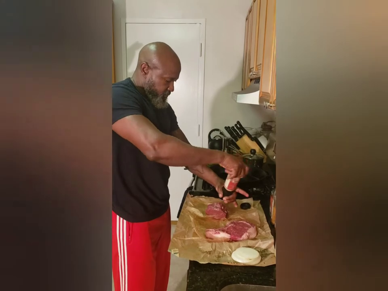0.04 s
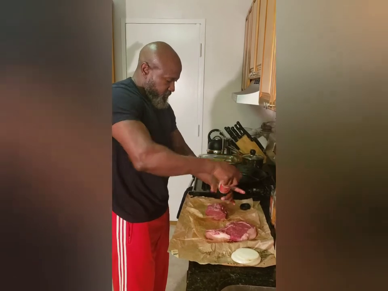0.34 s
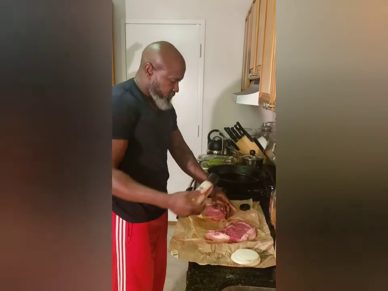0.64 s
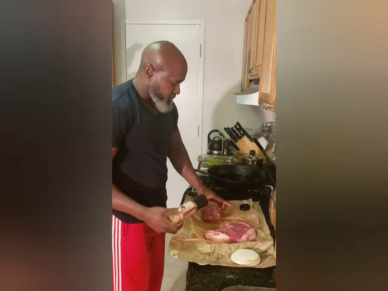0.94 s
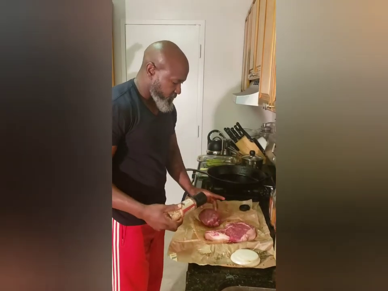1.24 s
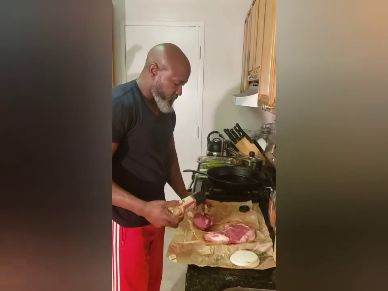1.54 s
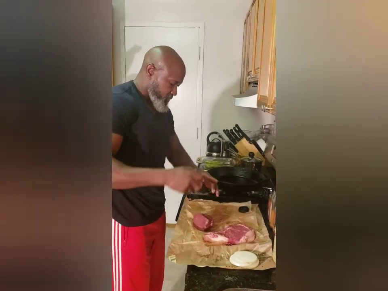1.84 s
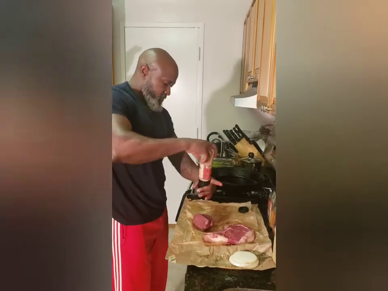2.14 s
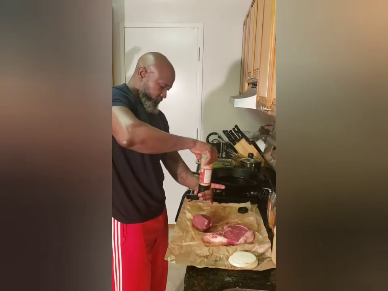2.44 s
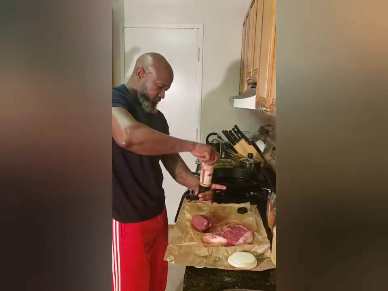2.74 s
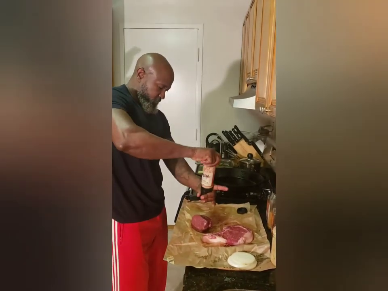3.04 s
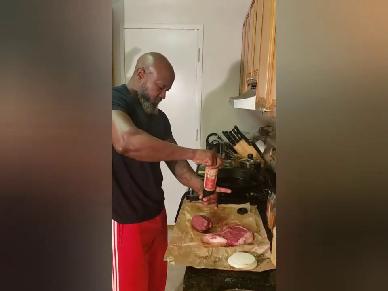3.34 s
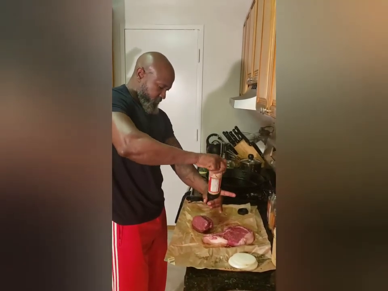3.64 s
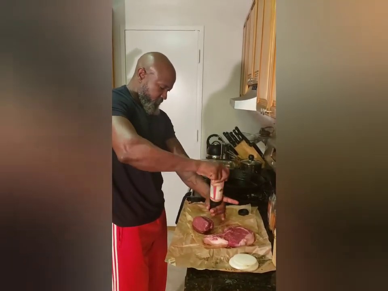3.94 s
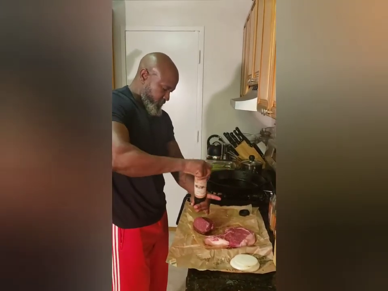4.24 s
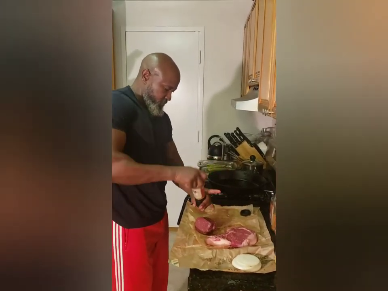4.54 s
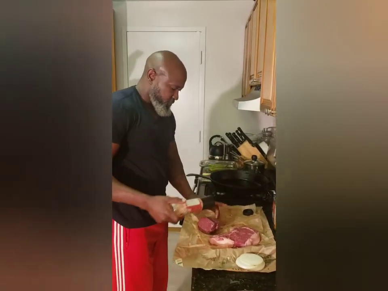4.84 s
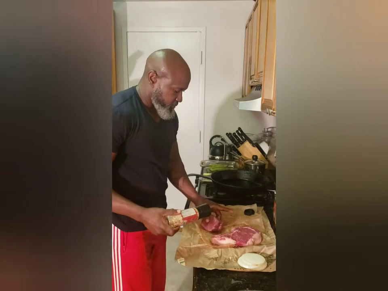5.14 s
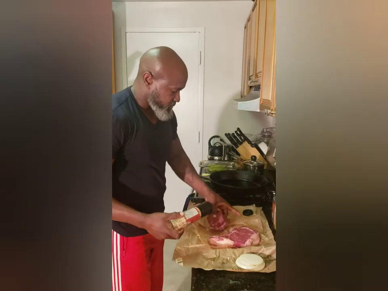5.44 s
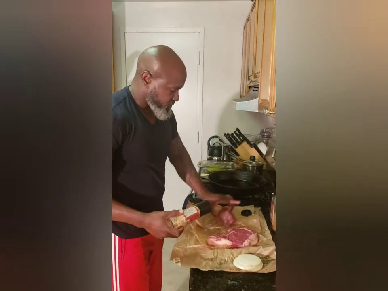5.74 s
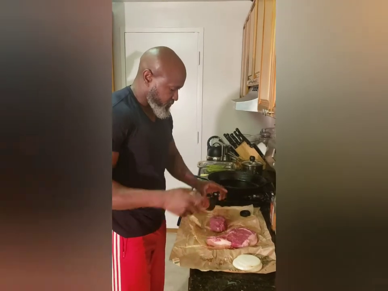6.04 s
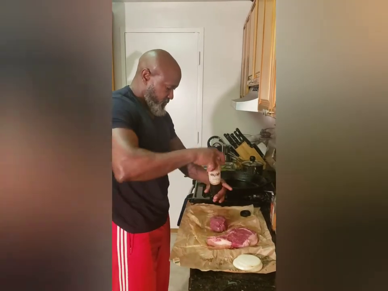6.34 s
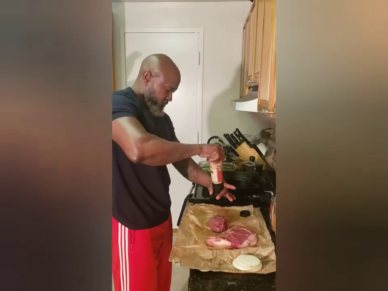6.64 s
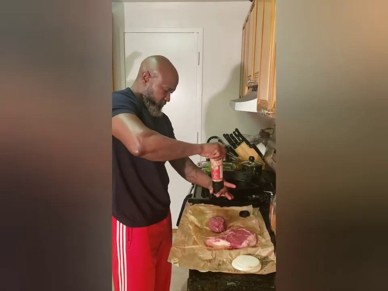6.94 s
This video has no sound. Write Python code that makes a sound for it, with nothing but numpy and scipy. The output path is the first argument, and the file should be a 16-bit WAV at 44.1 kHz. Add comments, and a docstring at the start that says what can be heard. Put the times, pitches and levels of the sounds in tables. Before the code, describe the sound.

A hand-held salt grinder gives a few crisp crunches, then its crystals slide as the jar tips. After a soft paper rustle comes a longer run of rasping twists, about three a second, dotted with sharp snaps. Salt pours along the jar again, paper crinkles under meat being turned, and a couple more twists follow. An appliance hums throughout, and the small kitchen adds a short echo to the nearby grinding.

```python
"""A hand-held salt grinder is twisted over meat, about three rasping turns a second.
The burr catches and slips, cracking crystals and ringing the plastic housing; loose salt slides
in the jar and pours down its wall when it is tipped. Between bouts the meat is turned over on
rustling paper, and there is one faint, thin squeak. An appliance hums throughout, and the hard
walls of the small kitchen answer every crunch."""
import sys
import numpy as np
from scipy import signal
from scipy.fft import rfft, irfft, next_fast_len
from scipy.io import wavfile
from scipy.ndimage import map_coordinates

SR = 44100
rng = np.random.default_rng(int(sys.argv[2]) if len(sys.argv) > 2 else 0)


def wrap_up_sound(samples):
    """Save the sound to the file named by the first command line argument, as 16-bit audio."""
    columns = np.atleast_2d(samples).T
    # keep every value between -1 and 1, then stretch to whole-number steps
    tamed = np.clip(columns, -1, 1)
    steps = np.round(tamed * 32767).astype(np.int16)
    wavfile.write(sys.argv[1], SR, steps)


N = 316638


def amp(db):
    """Decibels to gain."""
    return 10 ** (np.asarray(db) / 20)


def unit(x):
    """Scale to rms 1."""
    return x / np.sqrt(np.mean(x ** 2) + 1e-20)


def along(points, hz):
    """(frequency [Hz], value) points read on a log axis."""
    point_hz, values = np.transpose(points)
    return np.interp(np.log(hz + 1), np.log(point_hz + 1), values)


def curve(points):
    """(time [s], value) points joined by straight lines, one value per sample."""
    return np.interp(np.arange(N) / SR, *np.transpose(points))


def wobble(knots_per_s, step=16):
    """Smooth random curve, spread about 1."""
    coarse = np.arange(0, N + step, step)
    knots = rng.standard_normal(int(N * knots_per_s / SR) + 4)
    return np.interp(np.arange(N), coarse, map_coordinates(knots, [coarse * knots_per_s / SR]))


def filtered(x, response):
    """Apply a complex frequency response."""
    size = next_fast_len(N + SR // 2)
    return irfft(rfft(x, size) * response(np.fft.rfftfreq(size, 1 / SR)), size)[..., :N]


def coloured(x, spectrum, size=2048):
    """Minimum-phase filter of unit energy; clicks keep their attack."""
    cepstrum = irfft(np.log(amp(along(spectrum, np.fft.rfftfreq(size, 1 / SR)))))
    cepstrum[1:size // 2] *= 2
    cepstrum[size // 2 + 1:] = 0
    pulse = irfft(np.exp(rfft(cepstrum)))
    return signal.fftconvolve(x, pulse / np.linalg.norm(pulse))[:N]


def grains(per_s, spread_db):
    """Tiny contacts at random moments, most small, a few large; rms 1."""
    hit = rng.random(N) < per_s / SR
    size = amp(spread_db * np.clip(rng.standard_normal(N), -2, 2))
    return unit(hit * size * rng.choice([-1, 1], N))


def strokes(starts_s, holds_s, levels_db, rise_db_per_s, fall_db_per_s, depth_db=60):
    """Gain of a row of movements: each swells, holds and dies away; overlaps add in power."""
    t, power = np.arange(N) / SR, np.zeros(N)
    for start, hold, db, rise in np.broadcast(starts_s, holds_s, levels_db, rise_db_per_s):
        edges_s = [start - depth_db / rise, start + hold + depth_db / fall_db_per_s]
        span = slice(*np.searchsorted(t, edges_s))
        attack_db = rise * np.maximum(start - t[span], 0)
        decay_db = fall_db_per_s * np.maximum(t[span] - start - hold, 0)
        power[span] += amp(db - attack_db - decay_db) ** 2
    return np.sqrt(power)


def slips(per_s=45, scatter=0.4, life_s=0.002, jolt_db=10.5, count=800):
    """Gain of the burr letting go at uneven moments, each with a brief jolt."""
    gap, size = rng.standard_normal((count, 2)).T
    onsets = (np.cumsum(np.exp(scatter * gap)) / per_s * SR).astype(int)
    jolts = np.bincount(onsets, amp(jolt_db + 2 * size), N)[:N]
    return 1 + signal.lfilter([1], [1, -np.exp(-1 / (life_s * SR))], jolts)


# Burr and housing resonances: (frequency [Hz], width [Hz], relative level [dB])
HOUSING_MODES = [(1920, 90, -20), (2860, 150, -13), (3150, 170, 10), (3550, 170, 5), (3870, 710, 19),
                 (6350, 200, -8)]

def housing(x, grip_db=4, pitch_drift=0.03):
    """The grinder's parts ring; strength and pitch shift with the grip and the load of salt."""
    ring = np.zeros(N)
    for k, (hz, width_hz, db) in enumerate(HOUSING_MODES):
        mode = signal.lfilter(*signal.iirpeak(hz, hz / width_hz, SR), x)
        ring += (-1) ** k * amp(db + grip_db * np.tanh(wobble(7.3))) * mode
    read_position = np.cumsum(1 + pitch_drift * wobble(4.4)) % N
    return unit(np.interp(read_position, np.arange(N), ring))


# Twists of the burr: (time [s], hold [s], relative rasp [dB], deep crunch [dB], relative slide [dB])
TWIST_STROKES = [(0.0, 0.005, -39, -46, -31.5), (0.197, 0.018, -40, -44, -34.5),
                 (0.258, 0.013, -38.5, -43, -31.5), (2.278, 0.054, -34, -38.5, -32.5),
                 (2.639, 0.085, -36.5, -44, -39), (2.989, 0.033, -36, -47.5, -35.5),
                 (3.294, 0.077, -42.5, -50, -34.5), (3.608, 0.028, -35.5, -45.5, -30.5),
                 (3.883, 0.075, -42, -52.5, -33.5), (4.199, 0.092, -43, -54, -38),
                 (4.516, 0.016, -40.5, -50.5, -42), (6.55, 0.045, -45, -45, -37.5),
                 (6.898, 0.018, -41.5, -43, -34.5)]
# Fracture spectrum: (frequency [Hz], relative density [dB])
CRUNCH_SPECTRUM = [(600, -28.5), (1500, -23), (2400, 2), (3400, 10), (4500, 6), (5400, -1), (7400, -3.5),
                   (8700, -37.5), (10500, -10), (12000, 1), (15500, 4.5)]
# Deep crunch of big crystals: (frequency [Hz], relative density [dB])
DEEP_SPECTRUM = [(250, -10), (700, -7.5), (1200, -0.5), (2000, -0.5), (2800, -0.5), (5000, -33),
                 (15000, -34)]

def crushing(rise_db_per_s=510, fall_db_per_s=262, knock_db=-23.5):
    """Each slip of the burr is a clump of fractures that shakes the housing; winding back scrapes."""
    start_s, hold_s, rasp_db, deep_db, _ = np.transpose(TWIST_STROKES)
    bite = strokes(start_s, hold_s, rasp_db, rise_db_per_s, fall_db_per_s)
    big_crystals = strokes(start_s, hold_s, deep_db, rise_db_per_s, fall_db_per_s)
    jogged, scrape = regripping()
    knock = amp(knock_db) * jogged  # the jar's dull rattle in the hand
    fractures = unit(grains(per_s=2600, spread_db=3.5) * amp(1.4 * wobble(110)) * slips())
    rasp = amp(2.3) * coloured(fractures, CRUNCH_SPECTRUM) + amp(-3.5) * housing(fractures)
    deep = coloured(grains(per_s=1200, spread_db=4.5), DEEP_SPECTRUM)
    return np.hypot(bite, scrape) * rasp + np.hypot(big_crystals, knock) * deep


def stirring():
    """Gain of the loose crystals, stirred by every twist, regrip and tip of the jar."""
    start_s, hold_s, _, _, slide_db = np.transpose(TWIST_STROKES)
    twisted = strokes(start_s, hold_s, slide_db, rise_db_per_s=339, fall_db_per_s=221.5)
    jogged, _ = regripping()
    start_s, hold_s, slide_db, *_ = np.transpose(JAR_TIPS)
    tipped = strokes(start_s, hold_s, slide_db, rise_db_per_s=162, fall_db_per_s=116.5)
    return np.sqrt(twisted ** 2 + jogged ** 2 + tipped ** 2)


# Crystal contact spectrum: (frequency [Hz], relative density [dB])
GRIT_SPECTRUM = [(1000, -28.5), (1800, -30), (2600, -17.5), (3200, -13), (4400, -3.5), (5400, -2),
                 (7500, 1), (8600, -8.5), (10300, -6), (12000, -0.5), (15500, -1.5)]
# Trickle of fine powder: (time [s], relative level [dB])
POWDER_FLOW = [(0.0, -48), (.14, -58), (.42, -75), (.75, -50), (1.22, -61), (1.42, -58), (1.56, -64),
               (1.85, -61), (1.92, -43), (2.25, -42), (3.15, -50.5), (3.9, -51), (4.85, -50), (5.35, -64),
               (5.68, -75), (5.85, -54), (6.08, -52), (6.6, -55), (7.18, -56)]
# Powder spectrum: (frequency [Hz], relative density [dB])
POWDER_SPECTRUM = [(2000, -47.5), (5000, -24), (7500, -12), (8600, -25), (10500, -12), (12000, -7.5),
                   (15500, -4.5)]

def sliding(trickle_db=-1, shaken_db=-19):
    """Loose crystals hiss against each other and the jar in small avalanches; powder trickles on."""
    stir = stirring()
    contacts = grains(per_s=6000, spread_db=1.5) * amp(2.18 * wobble(70))
    powder = coloured(grains(per_s=2000, spread_db=2.5), POWDER_SPECTRUM)
    flow = amp(trickle_db + curve(POWDER_FLOW)) + amp(shaken_db) * stir
    return amp(2) * stir * coloured(contacts, GRIT_SPECTRUM) + flow * powder


# Appliance air noise: (frequency [Hz], relative density [dB])
AIR_SPECTRUM = [(20, -22), (42, -13.5), (75, -1), (98, -7), (150, -3), (260, -7), (370, -14), (500, -13),
                (680, -25), (1050, -28), (1500, -39), (2300, -48), (7500, -52), (15500, -56)]
# Left-right likeness of the air noise: (frequency [Hz], correlation [0-1])
AIR_CORRELATION = [(60, 0.89), (150, 0.86), (300, 0.75), (600, 0.43), (1500, 0.14), (15000, 0)]
# Motor tones: (frequency [Hz], rms level [dB])
HUM_TONES = [(76, -58.5), (119, -55.5), (177.6, -60), (247, -65), (414.5, -65), (829, -77.5), (1050, -81.5)]

def appliance(air_db=-48, waver_db=0.63, waver_rad=0.49):
    """A motor's slightly unsteady hum in a low rush of air."""
    def mid_side_gains(hz):
        angle = np.arccos(np.clip(along(AIR_CORRELATION, hz), -1, 1)) / 2
        return amp(along(AIR_SPECTRUM, hz)) * [np.cos(angle), np.sin(angle)]

    mid, side = filtered(rng.standard_normal((2, N)), mid_side_gains)
    air = unit(np.array([mid + side, mid - side]))
    t, hum = np.arange(N) / SR, np.zeros(N)
    for hz, db in HUM_TONES:
        peak = np.sqrt(2) * amp(db + waver_db * wobble(2.6))
        hum += peak * np.sin(2 * np.pi * hz * t + waver_rad * wobble(7))
    return amp(air_db) * air + hum


# The hand regrips or winds back: (time [s], hold [s], relative slide [dB], relative scrape [dB])
GRIP_SHIFTS = [(0.096, 0.0031, -31, -60), (0.318, 0.008, -36, -62), (0.476, 0.0051, -47, -71.5),
               (1.46, 0.017, -54, -52.5), (1.901, .055, -48, -83), (1.989, 0.026, -37, -64),
               (2.125, 0.13, -43, -54), (2.449, 0.021, -43, -55), (2.514, 0.11, -48, -58.5),
               (2.861, 0.051, -42.5, -53), (3.222, 0.1, -45, -54), (3.519, 0.018, -44.5, -50),
               (3.78, 0.095, -46, -51.5), (4.097, 0.1, -51.5, -59), (4.362, 0.032, -47, -61.5),
               (4.449, .035, -43, -53), (4.641, 0.039, -46.5, -49.5), (6.26, 0.083, -48, -62),
               (6.4, 0.086, -47.5, -77), (6.481, .04, -40, -46.5), (6.696, .014, -38.5, -49.5),
               (6.817, 0.052, -41.5, -50), (7.083, 0.068, -47.5, -51.5)]

def regripping(rise_db_per_hold=21.5, fall_db_per_s=315):
    """Gains of jogged crystals and idle burr; short jolts start sharply, long moves gently."""
    start_s, hold_s, slide_db, scrape_db = np.transpose(GRIP_SHIFTS)
    return [strokes(start_s, hold_s, db, rise_db_per_hold / hold_s, fall_db_per_s)
            for db in (slide_db, scrape_db)]


# Single crystals snap or strike the jar: (time [s], relative level [dB], relative body send [dB])
CRYSTAL_SNAPS = [(0.0995, -15, -45), (0.204, -25.5, -13), (0.4756, -21, -49), (.628, -21, -31),
                 (1.005, -31.5, -36), (1.4507, -30, -28), (1.991, -17, -45), (2.4573, -22, -25),
                 (2.6454, -32, -8), (2.678, -22, -6.5), (2.717, -27, -6), (2.7394, -22.5, -12.5),
                 (2.995, -20, -8.5), (3.2857, -13.5, -20), (3.3272, -17.5, -14.5), (3.385, -14, -44),
                 (3.5998, -13.5, -20.5), (3.621, -14.5, -14), (3.886, -18.5, -10.5), (4.518, -20.5, -13),
                 (4.891, -15, -31), (5.212, -25.5, -26.5), (5.772, -24.5, -28), (6.5531, -12, -17),
                 (6.597, -13.5, -18.5), (6.689, -15.5, -35), (6.923, -16, -18)]

def snapping(break_s=0.00063, crumble_s=0.024, crumble_db=-17):
    """A big crystal breaks in a millisecond; its splinters crumble after it."""
    t = np.arange(SR // 10) / SR
    envelope = np.exp(-t / break_s) + amp(crumble_db) * np.exp(-t / crumble_s)
    sharp, body = np.zeros((2, N + SR))
    for start_s, db, body_db in CRYSTAL_SNAPS:
        burst = amp(db) * envelope * rng.standard_normal(len(t))
        start = round(start_s * SR)
        sharp[start:start + len(t)] += burst
        body[start:start + len(t)] += burst * amp(body_db)
    return amp(-7.5) * coloured(sharp, GRIT_SPECTRUM) + amp(11.5) * coloured(body, CRUNCH_SPECTRUM)


# The jar is tipped level:
# (time [s], hold [s], relative slide [dB], pour [dB], landing time [s], relative rattle [dB])
JAR_TIPS = [(0.59, 0.1, -36.5, -54, 0.6, -47), (4.782, 0.077, -31.5, -37, 4.87, -56)]
# Salt pouring down the wall: (frequency [Hz], relative density [dB])
POUR_SPECTRUM = [(1500, -42), (2300, -7), (2900, -20), (3600, -8), (4300, 6.5), (5300, -4), (6500, 1),
                 (8000, -24), (12000, -21)]
# Salt landing: (frequency [Hz], relative density [dB])
RATTLE_SPECTRUM = [(500, -30), (1100, -6.5), (2000, 1), (2700, -2), (4300, -5), (7000, -4), (9000, -14),
                   (15500, -10)]

def tumbling(landing_hold_s=0.061):
    """The load pours brightly down the jar wall and lands with a hollow rattle."""
    start_s, hold_s, _, pour_db, landing_s, rattle_db = np.transpose(JAR_TIPS)
    pour = strokes(start_s, hold_s, pour_db, rise_db_per_s=206, fall_db_per_s=300)
    landing = strokes(landing_s, landing_hold_s, rattle_db, rise_db_per_s=698, fall_db_per_s=89.5)
    rattle = coloured(grains(per_s=3600, spread_db=4), RATTLE_SPECTRUM)
    hiss = coloured(grains(per_s=4300, spread_db=7), POUR_SPECTRUM)
    return amp(6) * landing * rattle + pour * hiss


# Meat handled on paper: (time [s], hold [s], relative rustle [dB], crisp crackle [dB])
PAPER_TOUCHES = [(1.044, 0.044, -61.5, -49.5), (1.29, 0.1, -89, -63.5), (5.227, .035, -66.5, -52),
                 (5.4, 0.01, -70, -65), (5.794, 0.017, -51, -36), (5.832, 0.0084, -53.5, -45)]
# Paper spectrum: (frequency [Hz], relative density [dB])
RUSTLE_SPECTRUM = [(200, -19), (700, -5), (1500, 0), (3500, 3.5), (5500, -6), (7400, -3), (8800, -19),
                   (15500, -1.5)]

def paper(rise_db_per_s=607, fall_db_per_s=165):
    """The salted sheet rustles and crackles under the meat."""
    start_s, hold_s, rustle_db, crisp_db = np.transpose(PAPER_TOUCHES)
    rustle_gain = strokes(start_s, hold_s, rustle_db, rise_db_per_s, fall_db_per_s)
    crisp_gain = strokes(start_s, hold_s, crisp_db, rise_db_per_s, fall_db_per_s)
    crinkles = unit(grains(per_s=2300, spread_db=5.5) * amp(3.7 * wobble(60)))
    crisp = coloured(grains(per_s=3000, spread_db=5), GRIT_SPECTRUM)
    return amp(12) * rustle_gain * coloured(crinkles, RUSTLE_SPECTRUM) + crisp_gain * crisp


# Faint squeak: (time [s], pitch [Hz])
SQUEAK_PITCH = [(1.6, 12900), (1.66, 13400), (1.72, 12600), (1.76, 12200), (1.8, 12700), (1.87, 12000)]

def squeak(level_db=-62, fade_db_per_s=400, rough_rad=2.1):
    """A narrow, slightly rough whistle wavers high in the treble."""
    start_s, end_s = SQUEAK_PITCH[0][0], SQUEAK_PITCH[-1][0]
    gain = strokes(start_s, end_s - start_s, level_db, fade_db_per_s, fade_db_per_s)
    phase = 2 * np.pi * np.cumsum(curve(SQUEAK_PITCH)) / SR
    return gain * np.sin(phase + rough_rad * wobble(500))


# Kitchen reverberation: (frequency [Hz], T60 [s])
KITCHEN_T60 = [(300, 0.64), (3000, 0.25), (8000, 0.34), (15000, 0.073)]

def kitchen(x, early_life_s=0.0065, early_share=0.55, paths=8):
    """Counter and cupboards answer at once, then the room dies away."""
    hz, t, noise = signal.stft(rng.standard_normal((paths, 2, SR // 3)), SR, nperseg=256)
    decay = amp(-60 * t / along(KITCHEN_T60, hz)[:, None])
    tail = signal.istft(noise * decay, SR, nperseg=256)[1]
    early = rng.standard_normal(tail.shape) * np.exp(-np.arange(tail.shape[-1]) / SR / early_life_s)
    responses = np.sqrt(1 - early_share) * tail / np.linalg.norm(tail[0, 0])
    responses += np.sqrt(early_share) * early / np.linalg.norm(early[0, 0])
    # each crystal radiates in its own direction, so the mix of paths changes quickly
    weights = np.array([wobble(70) for _ in range(paths)])
    weights /= np.linalg.norm(weights, axis=0)
    return signal.oaconvolve((weights * x)[:, None], responses, axes=2).sum(0)[:, :N]


# Where the grinder is held: (time [s], direct left minus right [dB])
GRINDER_PAN = [(0, 0), (.5, -3.5), (.9, -7.5), (1.6, -6.5), (2.0, -6.5), (3.3, -6), (4.5, -8), (4.9, -4.5),
               (5.2, -9.5), (5.9, -5.5), (6.5, -7.5), (7.18, -2)]

def scene(left_lag_s=0.00011):
    """Direct sound reaches the right port first; only sharp snaps stand out of the room."""
    work = sliding() + crushing() + tumbling() + paper() + squeak()
    snaps = snapping()
    direct = amp(-6) * work + amp(-2) * snaps
    room = amp(-1) * kitchen(work + amp(-4) * snaps)
    pan_db = curve(GRINDER_PAN)
    delayed = filtered(direct, lambda hz: np.exp(-2j * np.pi * hz * left_lag_s))
    return np.array([delayed * amp(pan_db / 2), direct * amp(-pan_db / 2)]) + room + appliance()


# Microphone port imbalance: (frequency [Hz], left minus right [dB])
PORT_BALANCE = [(100, -.5), (300, -0.5), (600, -5.5), (1300, -1.5), (2300, 0.5), (3200, -3.5), (4800, -2),
                (6700, 1), (7800, -1), (9000, -1.5), (10500, 1.5), (12000, -6.5), (15000, -10.5)]
TOP_HZ = 15850

def record(dry):
    """Each microphone port colours the sound its own way; nothing passes above the band limit."""
    return filtered(dry, lambda hz: amp(np.outer([1, -1], along(PORT_BALANCE, hz)) / 2) * (hz < TOP_HZ))


dry = scene()
out = record(dry)
wrap_up_sound(out)
```